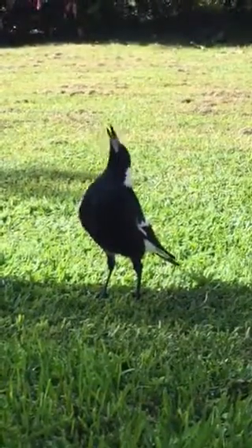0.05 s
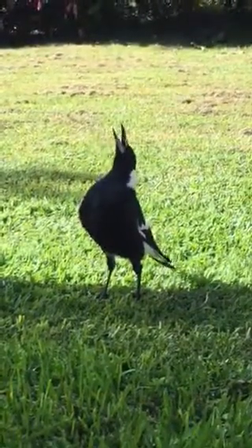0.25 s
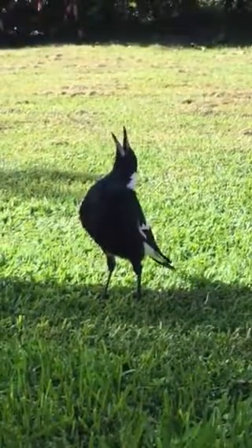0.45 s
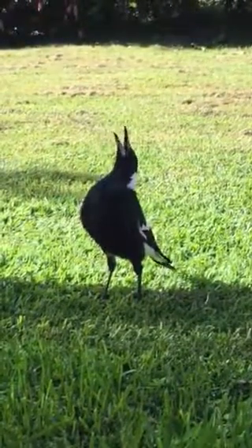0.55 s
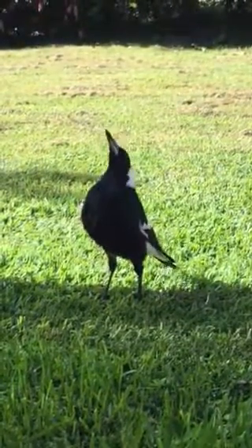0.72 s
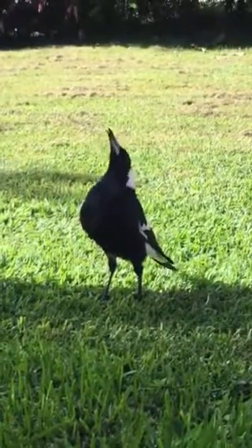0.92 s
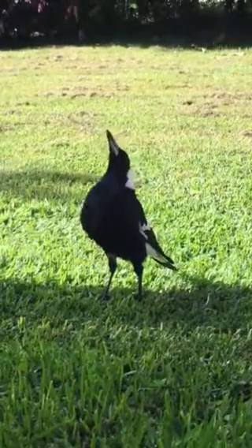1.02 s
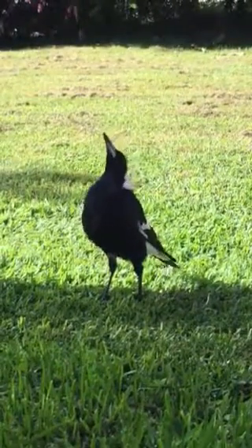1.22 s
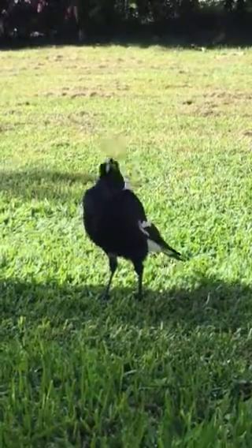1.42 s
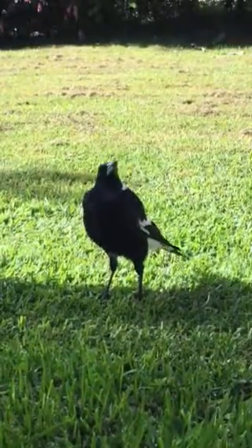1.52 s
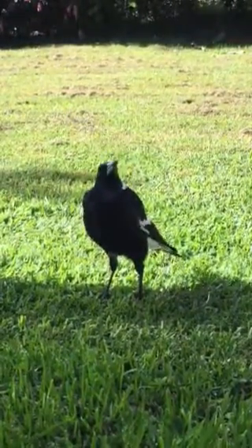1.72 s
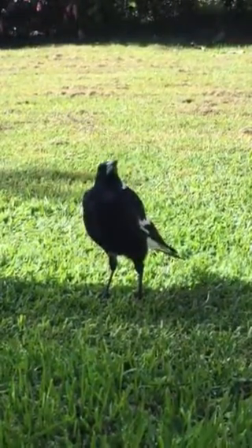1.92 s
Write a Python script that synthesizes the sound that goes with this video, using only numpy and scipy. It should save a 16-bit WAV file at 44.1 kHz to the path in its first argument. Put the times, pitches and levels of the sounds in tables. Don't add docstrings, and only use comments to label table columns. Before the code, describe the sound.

Loud fluting bird carol with two-toned, slightly raspy warble, then a softer sinking note and outdoor quiet

```python
import sys
import numpy as np
from scipy import signal
from scipy.fft import rfft, irfft
from scipy.io import wavfile
from scipy.ndimage import uniform_filter1d

SR = 44100
rng = np.random.default_rng(int(sys.argv[2]) if len(sys.argv) > 2 else 0)


def volts(x):
    e = np.asarray(x, float) / 20
    return 10 ** e


def master(y):
    cut = np.clip(np.atleast_2d(y).T, -1, 1)
    pcm = np.round(cut * 32767)
    wavfile.write(sys.argv[1], SR, pcm.astype(np.int16))


N = 85995

# start_s, peak_hz, spacing_hz, ripple_db
TUBE = [
    (0, 3975, 2300, 4.5),
    (.297, 4231, 1900, 3),
    (0.864, 3618, 2050, 5.5),
]


def evened(x):
    return x / np.sqrt(np.mean(abs(x) ** 2) + 1e-20)


def read(points, hz):
    f, value = np.transpose(points)
    return np.interp(np.log(hz + 1), np.log(f + 1), value)


def wander(hz):
    a, b = rng.standard_normal((N, 2)).T
    lowpass = np.exp(-(np.fft.fftfreq(N, 1 / SR) / hz) ** 2)
    return evened(np.fft.ifft((a + 1j * b) * lowpass))


def bed(colour, level_db, patchy_db):
    hz = np.fft.rfftfreq(2048, 1 / SR)
    a, b, patches = rng.standard_normal((N // 512 + 5, 1025, 3)).T
    patches = uniform_filter1d(patches, size=14, axis=0)
    patches = evened(uniform_filter1d(patches, size=4, axis=1))
    inside = (hz >= colour[0][0] * .7) & (hz <= colour[-1][0] * 1.1)
    gain = volts(read(colour, hz)[:, None] + patchy_db * patches) * inside[:, None]
    noise = signal.istft((a + 1j * b) * gain, nperseg=2048, noverlap=1536)[1]
    return volts(level_db) * evened(noise[:N])


def rumble():
    # pitch_hz, level_db per Hz
    traffic_colour = [(15, -26), (30, -8), (50, -3), (75, -2), (102, -0.5), (167, -4.5), (210, -18),
                      (275, -23), (330, -22), (430, -57), (730, -120)]
    return bed(traffic_colour, -60, patchy_db=3)


def air():
    # pitch_hz, level_db per Hz
    air_colour = [(150, -38), (250, -5.5), (359, -7), (738, -17.5), (1260, -7), (1600, -13), (1870, -12.5),
                  (2870, -11), (15200, -33)]
    return bed(air_colour, -68.5, patchy_db=1.2)


def whine():
    # pitch_hz, level_db rms
    machine_tones = [(1281, -79), (1922, -78.5), (2132, -79), (2347, -96.5), (2557, -77.5), (2772, -77.5),
                     (3198, -91.5), (4479, -85)]
    t = np.arange(N) / SR
    out = 0
    for hz, db in machine_tones:
        fading = 0.51 + 0.75 * wander(1.7)
        out = out + volts(db) * (np.exp(2j * np.pi * hz * t) * fading).real
    return out


def garden(x):
    echo_db, echo_t60_s, echo_start_s = -24, .23, .013
    taps = np.zeros(SR // 2)
    at = np.arange(0, len(taps) - 40, 40)
    taps[at + rng.integers(0, 40, len(at))] = rng.choice([-1., 1.], len(at))
    t = np.arange(len(taps)) / SR
    taps = taps * volts(-60 * t / echo_t60_s) * np.clip(t / echo_start_s, 0, 1) ** 2
    taps = signal.lfilter([.4], [1, -.6], taps)
    return volts(echo_db) * signal.fftconvolve(x, taps / np.linalg.norm(taps))[:N]


def membrane(notes, rough):
    t = np.arange(N) / SR
    size, weighted_hz = 1e-7, 1e-4
    for note in notes:
        s, hz, db = np.transpose(sorted(note))
        level = volts(np.interp(t, s, db)) * (t >= s[0]) * (t < s[-1])
        size = size + level
        weighted_hz = weighted_hz + np.interp(t, s, hz) * level
    hz = uniform_filter1d(weighted_hz / size, size=200)
    jitter_hz = 4 * (1 + 4 * rough) * wander(140).real
    turn = np.exp(2j * np.pi * np.cumsum(hz + jitter_hz) / SR)
    return turn, uniform_filter1d(size, size=150), hz


def syrinx(rough):
    # start_s, pitch_hz, level_db
    lead_notes = [
        [(0, 1097, -54), (.05, 1090, -47.5), (.08, 1068, -48.5), (.093, 1209, -71), (.11, 1120, -57.5),
         (.14, 1105, -56.5), (.155, 1007, -63.5)],
        [(.152, 1208, -61), (.17, 1253, -38.5), (.2, 1271, -27.5), (.23, 1202, -14.5), (.245, 1169, -10),
         (.262, 1144, -14), (.275, 1239, -24), (.292, 1140, -70.5)],
        [(.39, 1258, -54), (.405, 1340, -31), (.42, 1273, -29.5), (.442, 1251, -29), (.46, 1291, -60.5)],
    ]
    # start_s, pitch_hz, level_db
    carol_legs = [
        [(.252, 1647, -52), (.275, 1468, -29), (.29, 1280, -21), (.32, 1240, -9.5), (.337, 1219, -12),
         (.36, 1215, -5), (.401, 1202, -7), (.413, 1162, -20.5), (.448, 1172, -25)],
        [(.458, 1265, -27), (.472, 1387, -31.5), (.49, 1474, -28.5), (.52, 1466, -27), (.56, 1453, -20),
         (.6, 1423, -16), (.625, 1408, -14), (.65, 1386, -17.5)],
        [(.675, 1328, -11), (.72, 1291, -11), (.752, 1258, -10), (.762, 1230, -14), (.775, 1182, -26)],
        [(.784, 1212, -14.5), (.8, 1224, -31.5), (.84, 1226, -40.5), (.865, 1210, -63.5)],
    ]
    # start_s, pitch_hz, level_db
    fall_legs = [
        [(.86, 1066, -51), (.89, 1057, -33.5), (.93, 1021, -28.5), (.95, 1001, -18), (.975, 1004, -15),
         (.99, 993, -16), (1.03, 964.7, -13), (1.055, 970.3, -15.5), (1.07, 952.7, -20)],
        [(1.09, 927.3, -21.5), (1.11, 914.4, -23.5), (1.15, 908, -23.5), (1.17, 876, -28), (1.19, 869, -27),
         (1.23, 846, -31), (1.25, 842.5, -31.5), (1.27, 836, -32)],
        [(1.297, 839, -33.5), (1.315, 888.5, -42), (1.33, 864, -65), (1.35, 872, -51), (1.37, 908.4, -75),
         (1.39, 886.3, -56.5), (1.41, 852.5, -90)],
    ]
    # start_s, pitch_hz, level_db
    second_notes = [
        [(.152, 1203, -59.5), (.17, 1130, -37.5), (.19, 1164, -36.5), (.225, 1049, -46), (.24, 1076, -60)],
        [(.215, 1250, -53.5), (.235, 1367, -40), (.26, 1226, -37), (.275, 1311, -61)],
        [(.435, 1632, -49), (.462, 1602, -26), (.5, 1597, -25.5), (.54, 1563, -23), (.565, 1560, -20),
         (.6, 1546, -16.5), (.62, 1522, -18.5), (.645, 1515, -13.5), (.66, 1481, -19.5)],
        [(.68, 1454, -17.5), (.7, 1400, -17), (.72, 1361, -19.5), (.742, 1332, -20), (.76, 1309, -17),
         (.78, 1283, -19.5), (.8, 1314, -36.5), (.82, 1280, -52)],
        [(.862, 947, -61.5), (.885, 942, -45), (.92, 910.6, -37), (.94, 924, -55.5)],
        [(.965, 1135, -54.5), (.99, 1107, -32), (1.01, 1084, -31.5), (1.03, 1052, -34.5), (1.05, 1058, -24.5),
         (1.07, 1063, -25.5), (1.09, 1029, -32.5), (1.11, 1026, -28.5), (1.13, 987.6, -27)],
        [(1.17, 973, -30.5), (1.19, 939, -33), (1.21, 948.4, -31), (1.23, 878, -38.5), (1.25, 919.4, -33),
         (1.295, 900, -36), (1.31, 912.5, -51), (1.335, 954, -52)],
    ]
    carol_second = second_notes[2] + second_notes[3]
    fall_second = second_notes[5] + second_notes[6]
    voices = [membrane(lead_notes + [sum(fall_legs, [])], rough),
              membrane([sum(carol_legs, [])], rough),
              membrane(second_notes[:2] + [carol_second, second_notes[4], fall_second], rough)]
    return [np.array(row) for row in zip(*voices)]


def sidebands(parts, share, pitch, mean_hz):
    back_push_db, push_reach_hz, push_turn_rad = -2.5, 119, 1.6
    lead, second = parts[0] + parts[1], parts[2]
    side = lead ** 2 * second.conj() + volts(back_push_db) * second ** 2 * lead.conj()
    spread = (share * (pitch - mean_hz) ** 2).sum(0)
    return np.exp(1j * push_turn_rad) * side * np.exp(-spread / push_reach_hz ** 2)


def overtones(turns, share, parts, fed, own_db, mean_hz, rough):
    # start_s, gain_db, tilt_db per octave
    beak_moves = [(0.137, -7.5, -8.5), (.2, 0.5, -9.5), (0.249, -9.5, -8), (0.282, 7, -6),
                  (0.305, 9, -10.5), (.396, -6, 4), (0.406, 6.5, -4), (0.458, 10, -9.5), (.49, 8.5, -5),
                  (0.6, 6, -5), (0.698, 4.5, -3), (0.784, -1.5, -3), (0.851, 6, 4), (0.95, -13.5, -4.5),
                  (1.022, -14, 1.5), (1.08, 5, 5), (1.276, 4.5, -2), (1.329, -24, -19.5)]
    octave_own_db, second_own_db, cross_db, cross_turn_rad = -8, 5.5, 10, 2.7
    rasp_hz, puff_db, puff_hz = 150, -13, 900
    chaos_hz, chaos_from = 700, .5
    s, gain_db, tilt_db = np.transpose(beak_moves)
    t = np.arange(N) / SR
    gain_db, tilt_db = np.interp(t, s, gain_db), np.interp(t, s, tilt_db)
    chaos = np.clip((rough - chaos_from) / (1 - chaos_from), 0, 1)
    richness = volts([[0], [0], [second_own_db]])
    over = 0
    for k in range(2, 19):
        own = (share * richness * turns ** k).sum(0)
        own = own * volts(own_db + octave_own_db * (k == 2))
        cross = np.sqrt(k / 2) * (fed ** k - (parts ** k).sum(0))
        tone = own + volts(cross_db) * np.exp(1j * cross_turn_rad) * cross
        wide = wander(chaos_hz + puff_hz * k / 10)
        rasp = np.clip(rough * (k / 3) ** 1.25, 0, 1)
        flutter = (1 - chaos) * wander(rasp_hz * np.sqrt(k)) + chaos * wide
        puff = volts(puff_db) * rasp * (k > 3) * wide
        tone = tone * (np.sqrt(1 - rasp ** 2) + rasp * flutter + puff)
        tone = tone * np.exp(1j * k * k)
        beak_gain = volts(gain_db + tilt_db * np.log2(k * mean_hz / 4000))
        over = over + (tone * beak_gain).real * (k * mean_hz < 17000)
    return over


def windpipe(x, phrase):
    # pitch_hz, level_db
    first_colour = [(2400, -34), (3600, -26.5), (4700, -33.5), (5900, -34), (8200, -43.5), (10000, -37),
                    (12500, -43.5), (15000, -56.5)]
    # pitch_hz, level_db
    carol_colour = [(2400, -38), (3000, -34), (4200, -24.5), (6000, -31), (9000, -38), (11300, -56.5),
                    (13000, -56.5), (15000, -57.5)]
    # pitch_hz, level_db
    shut_colour = [(1650, -25), (2700, -28.5), (3700, -25.5), (5700, -42.5), (8000, -44.5), (10000, -46.5),
                   (10800, -64), (15000, -55)]
    # pitch_hz, width_hz, depth_db
    pouch_dips = [
        (7668, 500, -21),
        (5100, 520, -4),
        (6768, 537, -13),
    ]
    hz = np.fft.rfftfreq(N, 1 / SR)
    colours = (first_colour, carol_colour, shut_colour)
    out = 0
    for k, (start, peak_hz, spacing_hz, ripple_db) in enumerate(TUBE):
        dip_hz, width_hz, depth_db = pouch_dips[k]
        ripple = ripple_db * (np.cos(2 * np.pi * (hz - peak_hz) / spacing_hz) - 1)
        pouch = depth_db * np.exp(-((hz - dip_hz) / width_hz) ** 2)
        gate = uniform_filter1d(1. * (phrase == k), size=400)
        out = out + irfft(rfft(x * gate) * volts(read(colours[k], hz) + ripple + pouch), N)
    return out


def bird():
    # start_s, roughness 0-1
    airflow = [(.14, .2), (.23, .18), (.265, .62), (.3, .4), (.315, .04), (.397, .04), (.407, .72),
               (.455, .7), (.49, .13), (.6, .2), (.72, .28), (.79, .4), (.9, .3), (.95, .08), (1.03, .24),
               (1.1, .19), (1.3, .2)]
    # root_push_db, overtone_push_db, own_overtones_db
    push_levels = [
        (5.5, 4.5, 9),
        (-0.5, 3.5, 6),
        (2, 9.5, 1),
    ]
    t = np.arange(N) / SR
    rough = np.interp(t, *np.transpose(airflow))
    turns, sizes, pitch = syrinx(rough)
    total = sizes.sum(0)
    share = sizes / total
    mean_hz = (sizes * pitch).sum(0) / total
    parts = share * turns
    both = parts.sum(0)
    side = sidebands(parts, share, pitch, mean_hz)
    phrase = np.searchsorted([row[0] for row in TUBE[1:]], t)
    root_db, feed_db, own_db = np.array(push_levels)[phrase].T
    unsteady = 1 + .12 * rough * wander(150) + volts(-43) * wander(650)
    root = (both + volts(root_db) * 2 * share[2] * side) * unsteady
    fed = (both + volts(feed_db) * side) / (1 + volts(feed_db) * uniform_filter1d(abs(side), size=800))
    over = overtones(turns, share, parts, fed, own_db, mean_hz, rough)
    return (total * root).real + windpipe(total * over, phrase)


def scene():
    duck_db, duck_from_db = -1, -41.5
    voice = bird()
    loud = uniform_filter1d(voice ** 2, size=2000)
    duck = volts(duck_db * loud / (loud + volts(2 * duck_from_db)))
    hiss = (air() + whine()) * duck
    return (voice + garden(voice) + hiss + rumble())[None]


def masked(x):
    mask_db, masked_db, mask_from_hz = -25, -22, 1850
    hz, t, z = signal.stft(x, SR, nperseg=1024, noverlap=768)
    power = uniform_filter1d(abs(z) ** 2, size=5, axis=-1)
    near = uniform_filter1d(power, size=4, axis=-2)
    wide = uniform_filter1d(power, size=37, axis=-2)
    drop = (near < wide * volts(2 * mask_db)) & (hz[:, None] > mask_from_hz)
    z = z * np.where(drop, volts(masked_db), 1)
    return signal.istft(z, SR, nperseg=1024, noverlap=768)[1][:, :N]


def band_limit(x):
    return signal.sosfilt(signal.butter(12, 15400, fs=SR, output="sos"), x)


def record(dry):
    bass_cut = signal.butter(4, 42, "highpass", fs=SR, output="sos")
    mix = masked(signal.sosfilt(bass_cut, dry))
    return band_limit(mix)


dry = scene()
out = record(dry)
master(out)
```